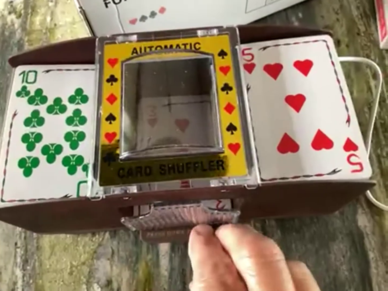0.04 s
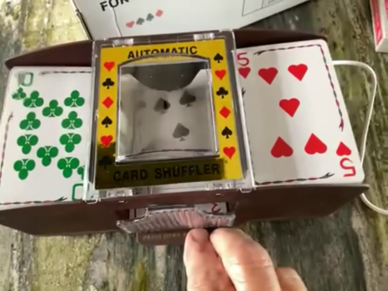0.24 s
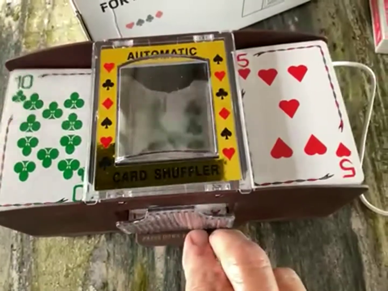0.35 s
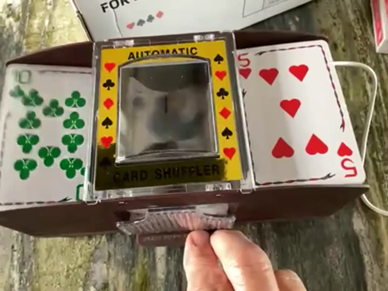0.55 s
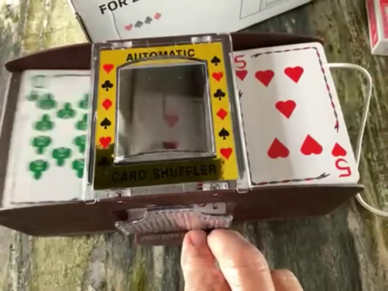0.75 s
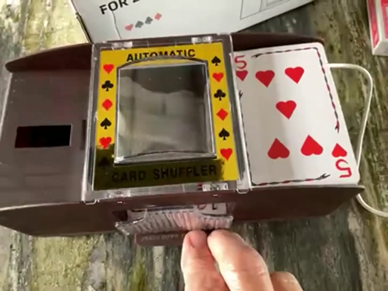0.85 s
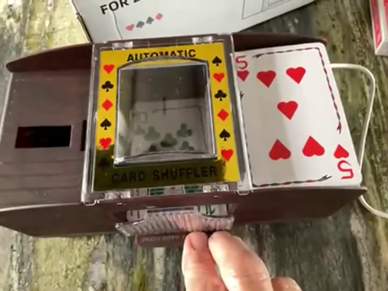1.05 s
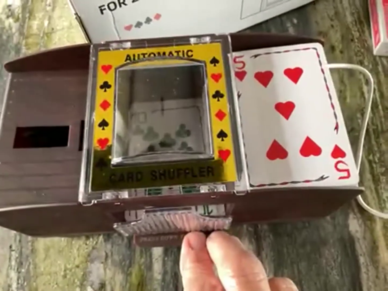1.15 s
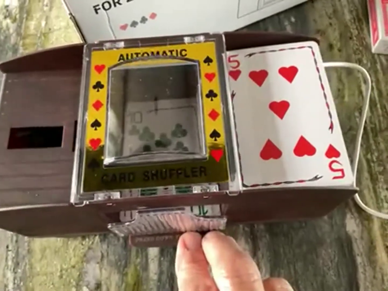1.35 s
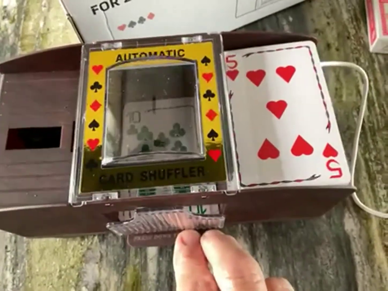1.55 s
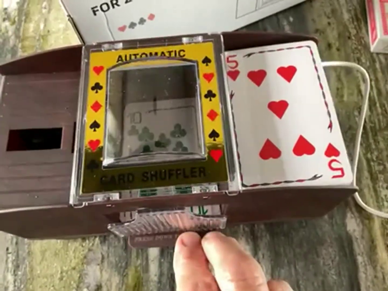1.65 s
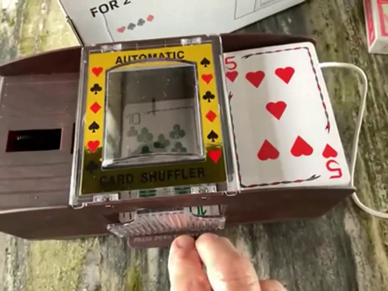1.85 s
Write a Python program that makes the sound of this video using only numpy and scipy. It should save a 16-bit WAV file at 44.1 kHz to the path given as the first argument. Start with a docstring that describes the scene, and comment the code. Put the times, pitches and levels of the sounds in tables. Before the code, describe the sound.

A small plastic card shuffler starts after a brief quiet hum, grinding and rattling as cards scrape and slap into its tray, then whirs empty and ticks to a stop, heard close in a quiet room.

```python
"""A quiet room in which a small motorised card shuffler runs for a moment above a low hum.
Random contacts of plastic gear teeth excite the modes of the housing, and a loose wheel rings on top.
Cards scrape through and slap into the tray as filtered contacts; single parts knock as decaying sines.
A thin motor tone wavers throughout; then the wheels run empty, tick ever slower and coast to a stop.
Feedback delays add a little room sound."""
import sys
import numpy as np
from scipy import signal
from scipy.fft import rfft, irfft, next_fast_len
from scipy.io import wavfile
from scipy.ndimage import uniform_filter1d

SR = 44100
rng = np.random.default_rng(int(sys.argv[2]) if len(sys.argv) > 2 else 0)


def master(y):
    """Save y as 16-bit WAV."""
    cut = np.clip(np.atleast_2d(y).T, -1, 1)
    pcm = np.round(cut * 32767)  # scale
    wavfile.write(sys.argv[1], SR, pcm.astype(np.int16))


def amplitude_ratio(level_db):
    """Convert a level in decibels to the matching linear amplitude (field) ratio."""
    exponent = np.asarray(level_db, float) / 20
    return 10 ** exponent


N = 83790  # samples
TIME_S = np.arange(N) / SR


def rms_one(x):
    """Normalisation: scales x to an rms of 1."""
    return x / np.sqrt(np.mean(x ** 2) + 1e-20)


def in_time(rows):
    """Linear interpolation: turns rows of (start_s, values..) into one curve per column."""
    start_s, *columns = np.transpose(rows)
    return [np.interp(TIME_S, start_s, column) for column in columns]


def drift(rate_hz):
    """Low-pass filtered noise: a slow random curve, rms 1, from a double real pole at rate_hz."""
    r = np.exp(-2 * np.pi * rate_hz / SR)
    noise = rng.standard_normal(N + SR)
    settled = signal.lfilter([1], [1, -2 * r, r * r], noise)[SR:]
    return rms_one(settled)


def colour(x, spectrum):
    """Minimum-phase filtering: the folded cepstrum of a smooth gain curve gives its causal response."""
    size = next_fast_len(N + 4096)
    hz = np.maximum(np.arange(size // 2 + 1) * SR / size, 1)
    point_hz, point_db = np.transpose(spectrum)
    log_gain = np.interp(np.log(hz), np.log(point_hz), point_db) * np.log(10) / 20
    cepstrum = irfft(log_gain, size)
    cepstrum[1:size // 2] *= 2
    cepstrum[size // 2 + 1:] = 0
    return irfft(rfft(x, size) * np.exp(rfft(cepstrum)), size)[:N]


def resonate(x, hz, width_hz):
    """Resonance: a pole pair whose radius sets the bandwidth, with gain near 1 at its peak."""
    r = np.exp(-np.pi * width_hz / SR)
    gain = (1 - r * r) / 2
    poles = [1, -2 * r * np.cos(2 * np.pi * hz / SR), r * r]
    return signal.lfilter([gain, 0, -gain], poles, x + 1e-18)


def clicks(per_s, spread_db):
    """Random impulse process: contacts at chance times, of uneven size and sign; rms 1."""
    excess = np.minimum(rng.exponential(1, N), 5)
    sizes = amplitude_ratio(spread_db * excess) * rng.choice([-1, 1], N)
    return rms_one(sizes * (rng.random(N) < per_s / SR))


def body(x, spectrum, modes, share_db):
    """Modal superposition: a broad colour plus modes of alternating sign, set to unit impulse energy."""
    def path(v):
        ringing = 0
        for k, (hz, width_hz, db) in enumerate(modes):
            ringing = ringing + (-1) ** k * amplitude_ratio(db) * resonate(v, hz, width_hz)
        return colour(v, spectrum) + amplitude_ratio(share_db) * ringing

    pulse = np.zeros(N)
    pulse[0] = 1
    return path(x) / np.sqrt(np.sum(path(pulse) ** 2))


def bursts(rows):
    """Transient envelopes: sums exponential rises and decays from (start_s, level_db, rise_s, decay_s)."""
    out = 0
    for start_s, db, rise_s, decay_s in rows:
        since = np.maximum(TIME_S - start_s, 0)
        out = out + amplitude_ratio(db) * (1 - np.exp(-since / rise_s)) * np.exp(-since / decay_s)
    return out


def tilt(x, low_db, high_db):
    """Shelving: adds or removes the band below 1400 Hz and the band above 7500 Hz."""
    low = signal.sosfilt(signal.butter(1, 1400, fs=SR, output="sos"), x)
    high = signal.sosfilt(signal.butter(2, 7500, "high", fs=SR, output="sos"), x)
    return x + low * (amplitude_ratio(low_db) - 1) + high * (amplitude_ratio(high_db) - 1)


# spectral shape of the room noise: hz, relative_db
FLOOR_SPECTRUM = [(15, -40), (45, -7.5), (60, -12.5), (150, -0.5), (250, -6.5), (400, -10.5), (800, -20.5),
                  (1500, -22.5), (3500, -26.5), (5800, -26), (7000, -32), (9000, -40), (15000, -59.5)]


def room_noise():
    """Broadband noise: white noise takes a smooth spectrum, and its level wavers slightly."""
    level = amplitude_ratio(-55.5 + 0.58 * drift(21))
    return level * rms_one(colour(rng.standard_normal(N), FLOOR_SPECTRUM))


# wavering low tones: pitch_hz, width_hz (of each of two filter passes), level_db
HUM_TONES = [(134.2, 20, -56), (220.3, 8.3, -65.5), (243.8, 3.7, -57.5)]


def hums():
    """Narrow-band noise: noise through two equal resonances is heard as a tone of wavering level."""
    out = 0
    for hz, width_hz, db in HUM_TONES:
        once = resonate(rng.standard_normal(N + SR), hz, width_hz)
        out = out + amplitude_ratio(db) * rms_one(resonate(once, hz, width_hz)[SR:])
    return out


# soft rustles around the machine: start_s, level_db (before the envelope's rise and decay),
# rise_s, decay_s, centre_hz, width_hz (of each of two filter passes)
RUSTLE_EVENTS = [(0.031, -49, 0.0027, .012, 790, 370.4), (0.099, -48, 0.027, 0.037, 346, 250),
                 (0.12, -54.5, 0.018, .025, 5600, 500), (1.859, -56.5, 0.0089, 0.0072, 356.4, 323)]


def rustles():
    """Enveloped band noise: twice-resonated noise swells and dies away."""
    out = 0
    for *envelope, hz, width_hz in RUSTLE_EVENTS:
        once = resonate(rng.standard_normal(N), hz, width_hz)
        out = out + bursts([envelope]) * rms_one(resonate(once, hz, width_hz))
    return out


# the drive slackens for a moment: centre_s, change_db (mostly dips)
SLACK_MOMENTS = [(.38, -3), (.643, -4), (.675, -4), (0.726, -9.5), (.758, -0.5), (.841, -5.5),
                 (0.924, -1.5), (0.9, -5), (1.041, -2), (1.302, 0.5)]


def slack():
    """Amplitude modulation: brief bell-shaped changes of the drive, in dB."""
    spread_s = 0.0033
    return sum(db * np.exp(-((TIME_S - s) / spread_s) ** 2 / 2) for s, db in SLACK_MOMENTS)


def coasting_ticks():
    """Rotational modulation: once a turn the coasting wheel ticks, ever slower; level swing in dB."""
    start_s, turn_hz, sag_hz_per_s = 1.5295, 78.6, 40
    swing_db, grows_s = 10, 0.1
    since = np.maximum(TIME_S - start_s, 0)
    turns = turn_hz * since - sag_hz_per_s * since ** 2 / 2
    return swing_db * np.minimum(since / grows_s, 1) * (np.cos(np.pi * turns) ** 2 - 0.5)


# drive of the gear train: start_s, level_db, boom_db (bass tilt), treble_db (treble tilt),
# wheel_db (push on the loose wheel, relative)
GEAR_DRIVE = [(.2, -59, 8, 2, -68), (.208, -37.5, 11.5, 4, -53), (.226, -34, 12, 6, -52),
              (.232, -25, 7.5, -5, -54), (.3, -21, 2, 4, -48), (.45, -18, 2.5, 5.5, -45),
              (.54, -28, 6.5, 8, -25.5), (.61, -28.5, 10, 10.5, -28.5), (.675, -27, -2.5, 3.5, -49),
              (.72, -21.5, 0.5, 5.5, -43), (.76, -28, 3, 5.5, -52), (.84, -23, 3, 7.5, -23),
              (.87, -19.5, 0, 2, -22), (1.03, -25, 1.5, 7, -21), (1.11, -19.5, -2.5, 4.5, -19.5),
              (1.2, -23.5, 1, 5, -21), (1.29, -22, -1, 4, -19.5), (1.36, -20, -3, 5.5, -15.5),
              (1.46, -19, 0.5, 3, -20.5), (1.53, -26.5, 0, 4, -22), (1.6, -31.5, 5, 0, -31.5),
              (1.65, -34.5, 7.5, 6, -24), (1.7, -51, 18, 0, -58), (1.76, -58, 13.5, 4, -71),
              (1.81, -75.5, 17, -9.5, -88)]
# modes of the housing: pitch_hz, width_hz, relative_db
HOUSING_MODES = [(828, 200, -2), (1043, 17, -2), (2422, 68, 1), (3080, 32, -16), (4030, 245, 2.5),
                 (5815, 65.7, -3), (5900, 110, -21), (8670, 66, -11.5), (11640, 100, -21),
                 (14540, 400, -20)]
# broad colour of the tooth chatter: hz, relative_db
CHATTER_SPECTRUM = [(120, -77.5), (200, -29), (386, -5.5), (717, -7.5), (800, -0.5), (1820, -6),
                    (2870, 1.5), (3630, -8.5), (4860, -0.5), (12300, -25.5), (15600, -24)]
# gear teeth catch harder: start_s, relative_db, decay_s
TOOTH_CATCHES = [(0.649, 0, 0.0076), (.681, -1, .006), (0.728, -8, 0.0088), (0.765, -9, 0.026),
                 (0.806, 4, 0.0041), (0.848, -10, 0.018), (1.0274, 4, 0.0037), (1.0443, -3, 0.013),
                 (1.1063, 1.5, 0.0083), (1.1497, 2, 0.0038), (1.189, -8.5, 0.02), (1.22, -1, 0.0052),
                 (1.3095, -0.5, 0.0067), (1.391, -1, 0.0058), (1.529, -3.5, 0.0051), (1.5771, -3, 0.0038),
                 (1.658, -15, 0.0041), (1.735, -30.5, 0.0041), (1.748, -24, 0.0066)]


def gears():
    """Impulsive excitation: teeth drive the housing modes, swelling once a shaft turn; a wheel joins."""
    level_db, boom_db, treble_db, wheel_db = in_time(GEAR_DRIVE)
    shaft_hz, shaft_db, uneven_db = 50, 0.23, 0.7
    shaft_phase = 2 * np.pi * shaft_hz * TIME_S + 0.27 * drift(4.74)
    turn_db = shaft_db * np.sin(shaft_phase) + uneven_db * drift(31)
    turn_db = turn_db + coasting_ticks() / 2 + slack()
    push = amplitude_ratio(level_db + turn_db) * (TIME_S > GEAR_DRIVE[0][0])
    catch_db, catch_rise_s = -17.5, 0.0025
    push = push + bursts([(s, db + catch_db, catch_rise_s, decay_s) for s, db, decay_s in TOOTH_CATCHES])
    teeth = clicks(per_s=4500, spread_db=2) * push
    chatter = body(teeth, CHATTER_SPECTRUM, HOUSING_MODES, share_db=-6)
    wheel = loose_wheel(wheel_db)
    return tilt(chatter, boom_db + 0.12 * drift(30), treble_db + 2.14 * drift(30)) + wheel


# modes of the loose wheel: pitch_hz, width_hz, relative_db
WHEEL_MODES = [(4610, 200, -7.5), (4800, 156, 2), (4935, 170, 0.5), (5200, 150, -5.5), (5910, 210, -10.5)]


def loose_wheel(wheel_db):
    """Modal ringing: random taps, first softened around 6700 Hz, ring modes of wavering strength."""
    taps = clicks(per_s=2200, spread_db=2)
    push_db = wheel_db + 17.5 + 1.4 * drift(60) + coasting_ticks() + slack()
    taps = taps * amplitude_ratio(push_db) * (TIME_S > GEAR_DRIVE[0][0])
    softened = resonate(taps, 6700, 2600)
    out = 0
    for k, (hz, width_hz, db) in enumerate(WHEEL_MODES):
        mode_gain = amplitude_ratio(db + 1.2 * drift(3.8))
        out = out + (-1) ** k * mode_gain * resonate(softened, hz, width_hz)
    return out


# motor tone: start_s, pitch_hz, level_db (of the sine's peak, before wavering)
WHINE_PATH = [(.21, 790, -56), (.3, 781.4, -50), (.8, 795, -42.5), (1.05, 785, -31), (1.1, 851, -39.5),
              (1.29, 851, -32.5), (1.345, 770, -34), (1.4, 811, -28), (1.445, 860, -47), (1.52, 779, -47),
              (1.7, 756, -49), (1.8, 781, -61.5)]


def whine():
    """Frequency modulation: a thin sine whose pitch and level waver at random around a set path."""
    hz, db = in_time(WHINE_PATH)
    phase = 2 * np.pi * np.cumsum(hz * (1 + 0.01143 * drift(12.7))) / SR
    running = (TIME_S > WHINE_PATH[0][0]) * (TIME_S < WHINE_PATH[-1][0])
    return amplitude_ratio(db + 3 * drift(40)) * np.sin(phase) * running


# cards scraping through while the stack feeds: start_s, level_db
FEED_LEVEL = [(.225, -42), (.231, -38), (.25, -26.5), (.32, -27), (.38, -21), (.39, -19), (.44, -24),
              (.465, -17.5), (.49, -22.5), (.53, -25), (.62, -23.5), (.71, -32), (.9, -45)]
# cards slap home as short rattles: start_s, level_db (before rise and decay), rise_s, decay_s,
# brightness_db (treble tilt until the next slap; the bass tilts by half as much the other way)
CARD_SLAPS = [(.289, -10, 0.00062, 0.0037, 4.5), (0.313, -14, 0.00089, 0.0042, -9),
              (0.32, -8.5, 0.00045, 0.0029, 7), (0.333, -16, 0.001, 0.0026, 5),
              (0.386, 0.5, 0.00028, 0.0017, 9), (0.394, -13, 0.0009, 0.0033, 1),
              (0.418, -3, 0.0019, 0.0041, 7.5), (.422, -4.5, .001, 0.0031, 6.5),
              (0.4687, -1.5, 0.0011, 0.0027, -4.5), (0.4734, -2.5, 0.0025, 0.0032, -9),
              (0.5051, 5.5, 0.0015, 0.0034, 6.5), (0.5557, -10, 0.0011, 0.0026, -10),
              (0.559, -1.5, 0.0013, 0.0034, 3), (0.631, -17, 0.0008, 0.0032, -1),
              (0.655, -14, 0.001, 0.0079, 7.5), (0.6891, -9.5, 0.0027, 0.0028, -15),
              (0.698, -11, 0.0018, 0.0047, -5), (0.708, -18, 0.0026, 0.011, -4)]
# broad colour of the cards: hz, relative_db
CARD_SPECTRUM = [(120, -45.5), (200, -40), (358, -2.5), (654, -13), (814, 4.5), (1380, -1.5), (1600, -0.5),
                 (3260, -1.5), (4690, 4.5), (15600, -34)]
# modes of the tray: pitch_hz, width_hz, relative_db
TRAY_MODES = [(1590, 79, 2), (2980, 310, -10), (3840, 24, -3.5), (4564, 160, 7.5), (4506, 71, 5),
              (6030, 260, -1), (6880, 330, 1)]


def cards():
    """Friction and impact: edges scrape along the guides and slap into the tray, ringing its modes."""
    feed_db, = in_time(FEED_LEVEL)
    feeding = (TIME_S > FEED_LEVEL[0][0]) * (TIME_S < FEED_LEVEL[-1][0])
    push = amplitude_ratio(feed_db + 3.2 * drift(24) + slack()) * feeding
    slaps = bursts([row[:4] for row in CARD_SLAPS]) * clicks(per_s=16000, spread_db=2.5)
    scrapes = clicks(per_s=2500, spread_db=1.5) * push
    sound = body(scrapes + slaps, CARD_SPECTRUM, TRAY_MODES, share_db=-0.1)
    slap_table = np.array(CARD_SLAPS)
    latest = np.maximum(np.searchsorted(slap_table[:, 0], TIME_S) - 1, 0)
    bright_db = uniform_filter1d(slap_table[latest, 4], size=40)  # smooths the steps
    return tilt(sound, -bright_db / 2, bright_db)


# single parts knock: start_s, relative_db, pitch_hz, t60_s (time to decay by 60 dB)
PART_KNOCKS = [(0.267, -18.5, 401.7, 0.034), (0.307, -15, 416, 0.027), (0.458, -14, 788, 0.025),
               (0.475, -20, 1629, 0.069), (.61, -24.5, 415, 0.058), (0.623, -32, 255, 0.052),
               (.69, -11.5, 1590, 0.024), (.272, -35, 14500, .018), (.310, -34, 14600, .018),
               (0.762, -22.5, 5900, 0.062), (0.912, -19.5, 3730, 0.038), (1.21, -16, 5800, 0.041),
               (1.392, -15.5, 4080, 0.028), (1.495, -19.5, 780, 0.057), (1.661, -22.5, 772, 0.03)]


def knocks():
    """Free decay: each knock is one mode, a sine of chance phase that dies exponentially."""
    out = 0
    for start_s, db, hz, t60_s in PART_KNOCKS:
        phase = rng.uniform(0, 2 * np.pi)
        envelope = 2 * bursts([(start_s, db, 0.003, t60_s / np.log(1000))])
        out = out + envelope * np.sin(2 * np.pi * hz * TIME_S + phase)
    return out


def room(x):
    """Reverberation: eight feedback delays lose level and treble on every round."""
    t60_s, wall_cut_hz = 0.37, 6100
    dull = np.exp(-2 * np.pi * wall_cut_hz / SR)
    lags = (rng.uniform(0.012, 0.035, 8) * SR).astype(int)
    out = np.zeros(N)
    for k, lag in enumerate(lags):
        loop, state = x.copy(), [0.]
        gain = amplitude_ratio(-60 * lag / SR / t60_s)
        for i in range(lag, N, lag):
            back, state = signal.lfilter([gain * (1 - dull)], [1, -dull], loop[i - lag:i], zi=state)
            loop[i:i + lag] += back[:N - i]
        out += (loop - x) * (-1) ** k  # reflections only
    return out


def scene():
    """Superposition: the machine without its bass, a little of its room sound, and the background."""
    machine = gears() + whine() + cards() + knocks()
    machine = signal.sosfilt(signal.butter(2, 196, "high", fs=SR, output="sos"), machine)
    reflections = amplitude_ratio(-19) * room(machine)
    background = hums() + rustles() + room_noise()
    return (machine + reflections + background)[None]


def top_cut(x):
    """Nothing passes above the cut-off."""
    return signal.sosfilt(signal.butter(12, 15770, fs=SR, output="sos"), x)


def record(dry):
    """Saturation and band limiting: peaks are rounded, then the deep bass and the top are cut."""
    ceiling = 0.9
    mix = ceiling * np.tanh(dry / ceiling)
    mix = signal.sosfilt(signal.butter(4, 46, "high", fs=SR, output="sos"), mix)
    mix = signal.sosfilt(signal.ellip(12, 0.5, 70, 15750, fs=SR, output="sos"), mix)
    return top_cut(mix)


dry = scene()
out = record(dry)
master(out)
```